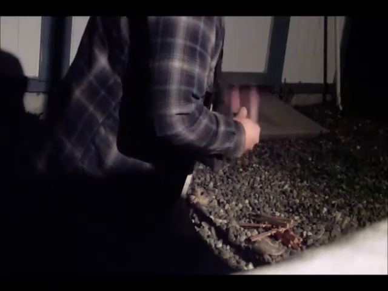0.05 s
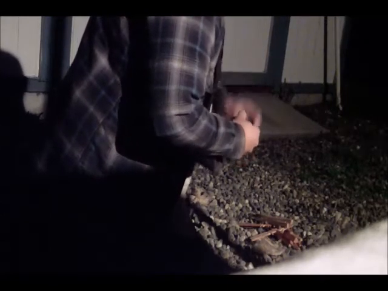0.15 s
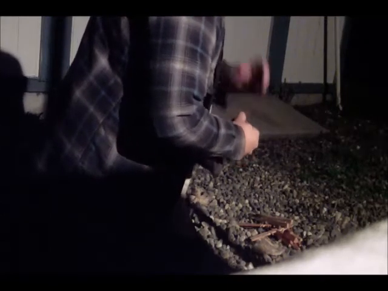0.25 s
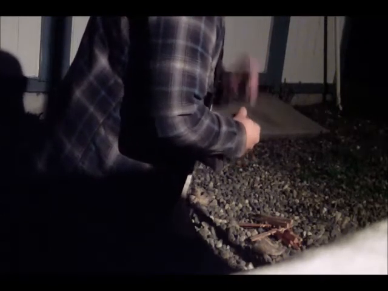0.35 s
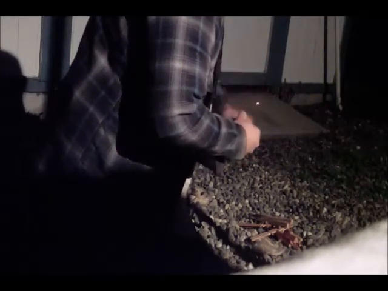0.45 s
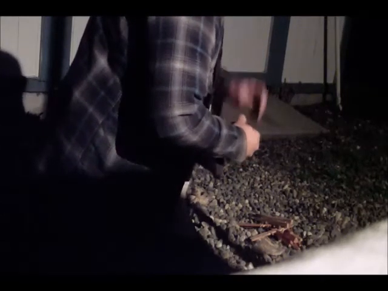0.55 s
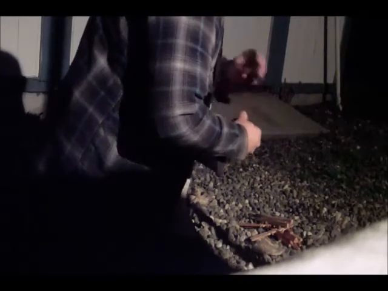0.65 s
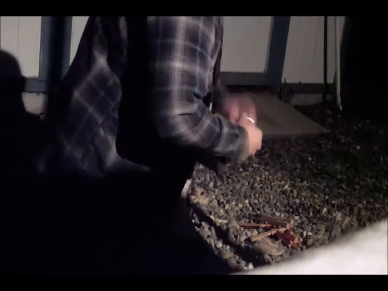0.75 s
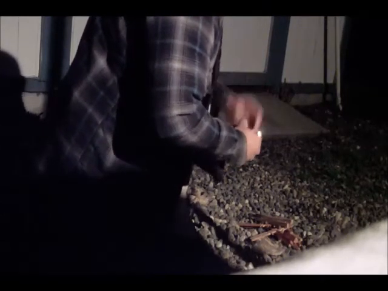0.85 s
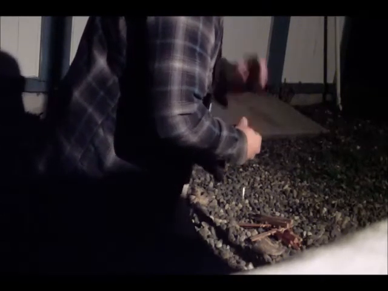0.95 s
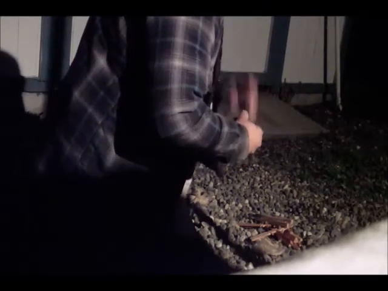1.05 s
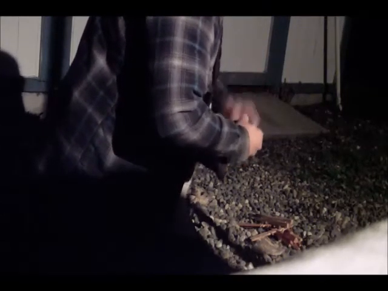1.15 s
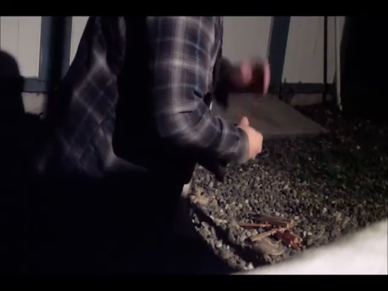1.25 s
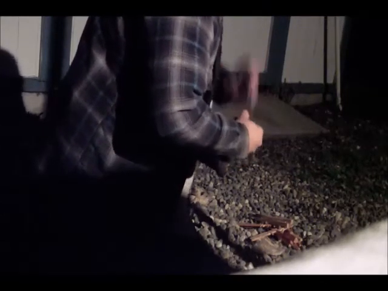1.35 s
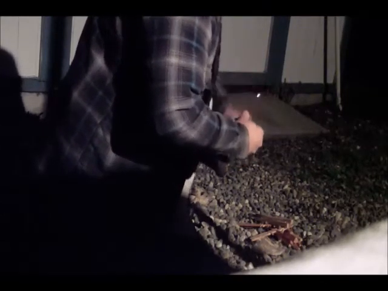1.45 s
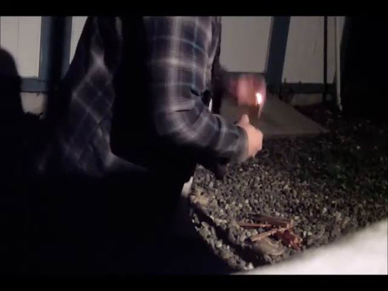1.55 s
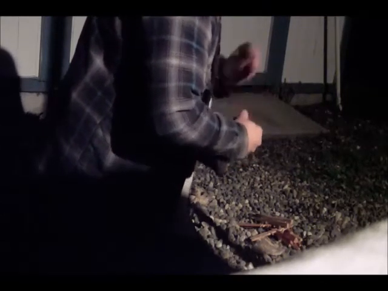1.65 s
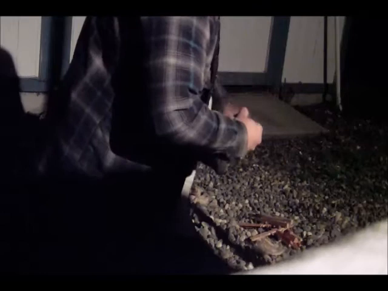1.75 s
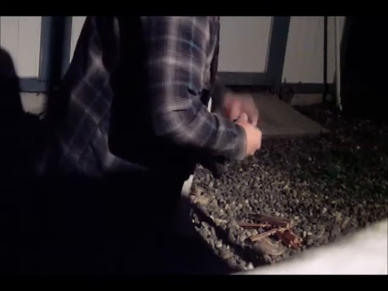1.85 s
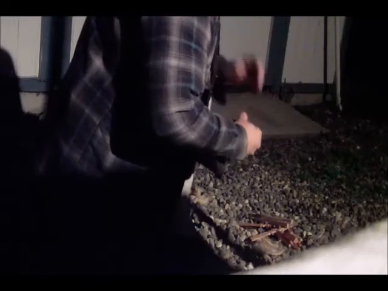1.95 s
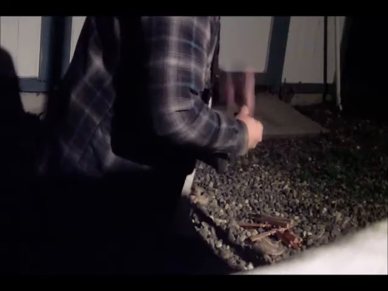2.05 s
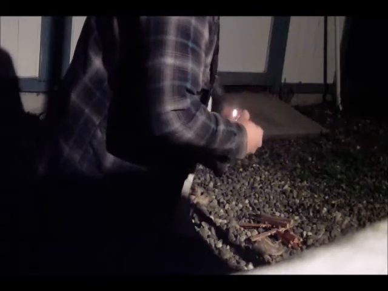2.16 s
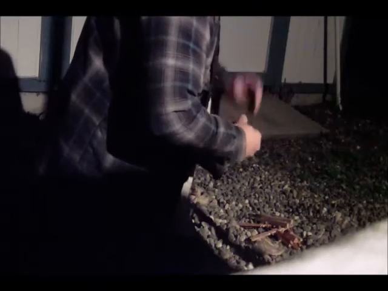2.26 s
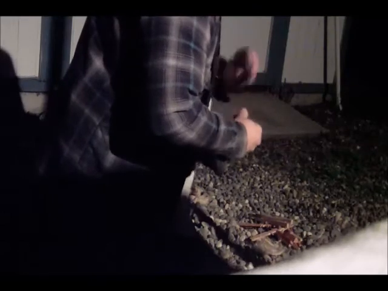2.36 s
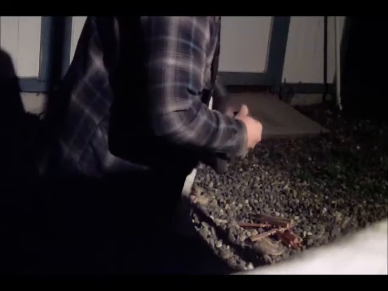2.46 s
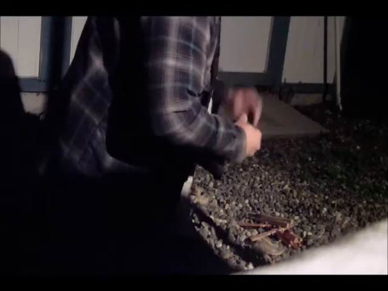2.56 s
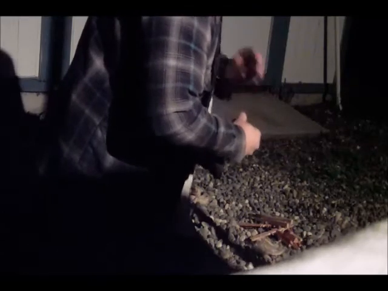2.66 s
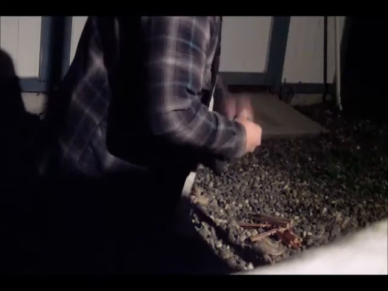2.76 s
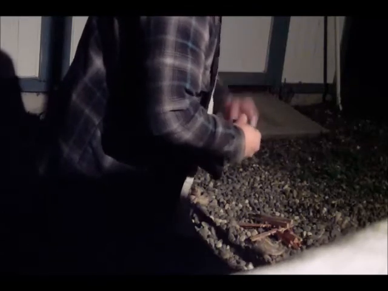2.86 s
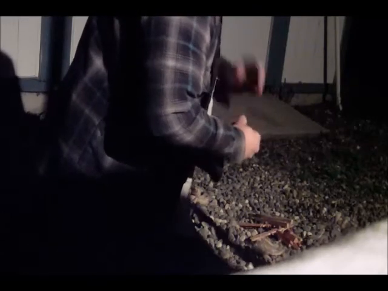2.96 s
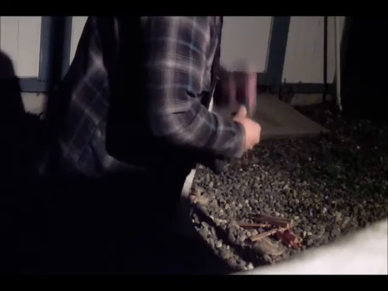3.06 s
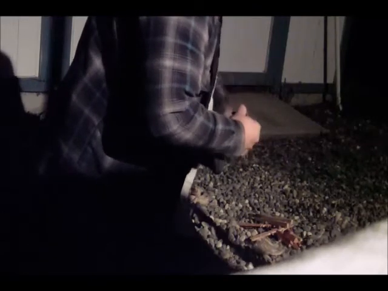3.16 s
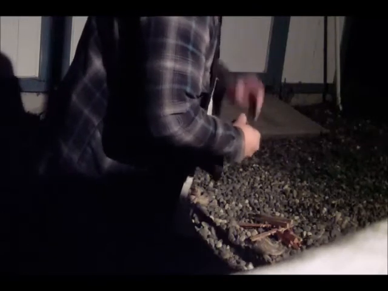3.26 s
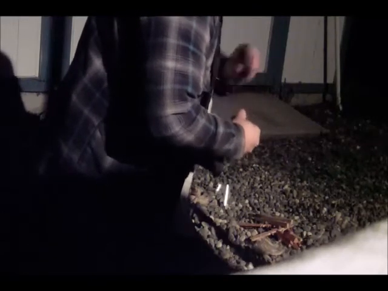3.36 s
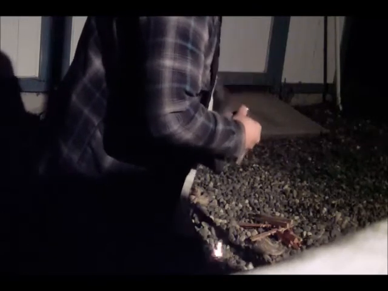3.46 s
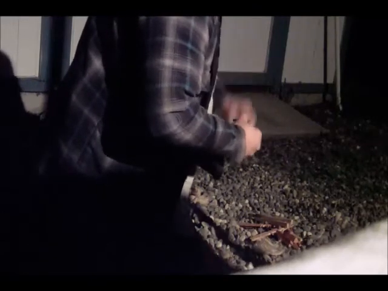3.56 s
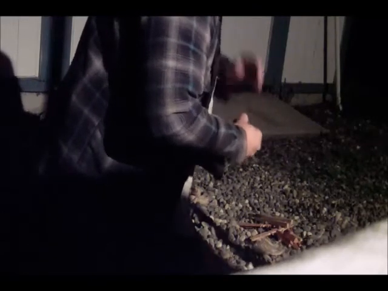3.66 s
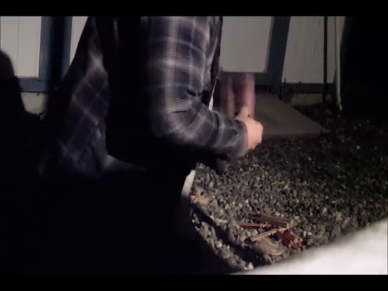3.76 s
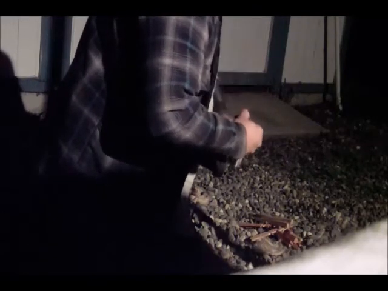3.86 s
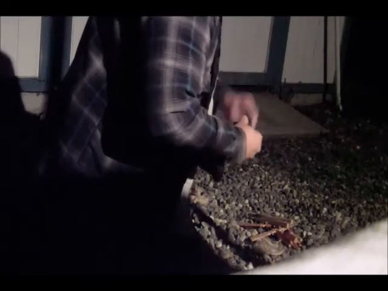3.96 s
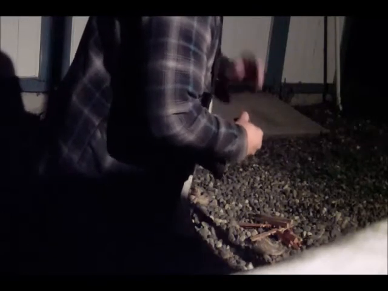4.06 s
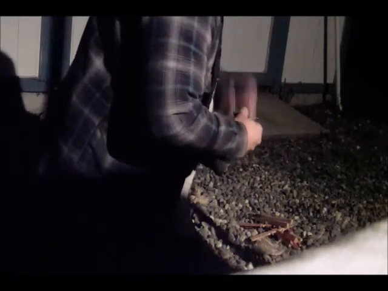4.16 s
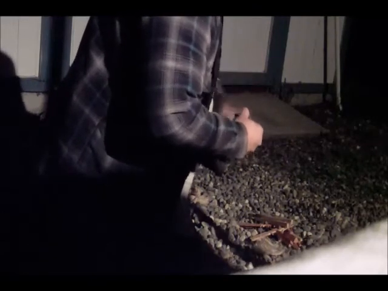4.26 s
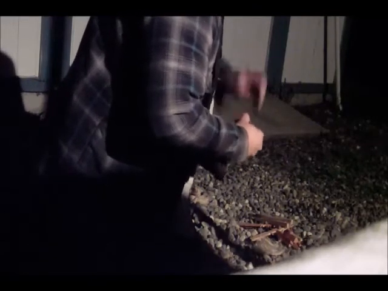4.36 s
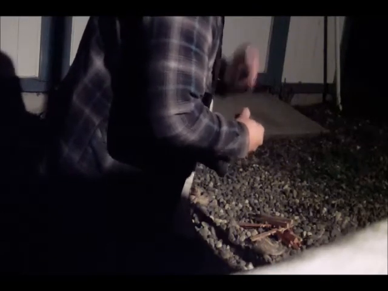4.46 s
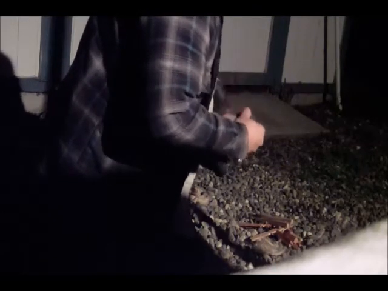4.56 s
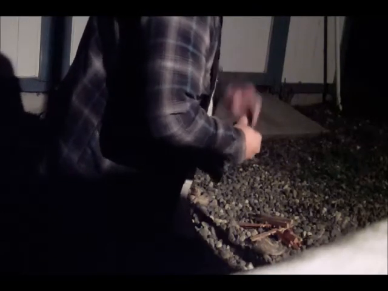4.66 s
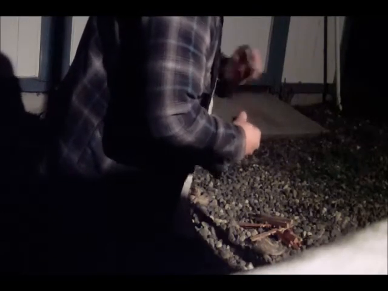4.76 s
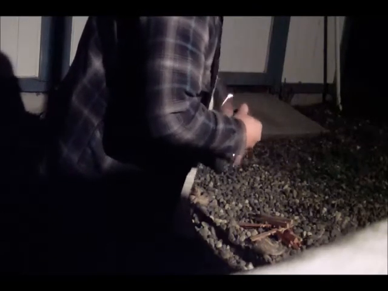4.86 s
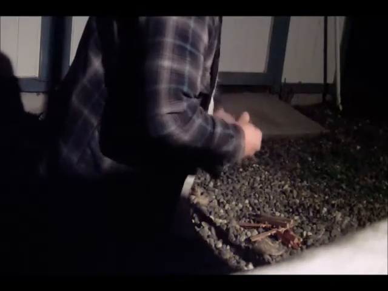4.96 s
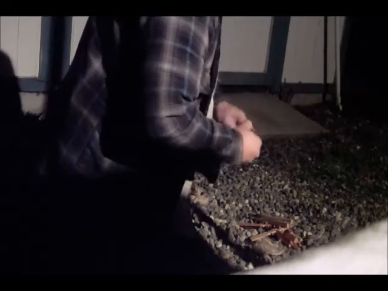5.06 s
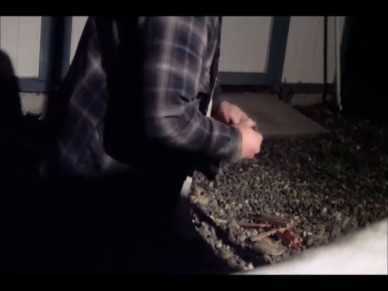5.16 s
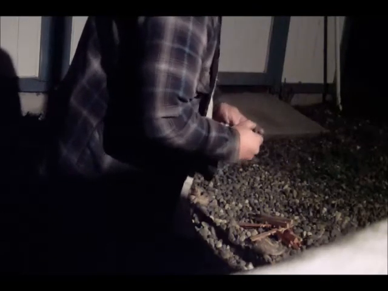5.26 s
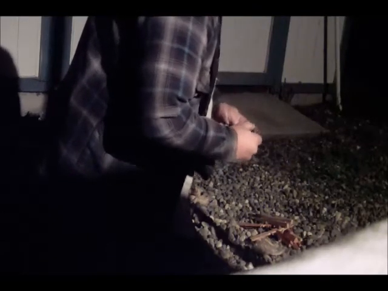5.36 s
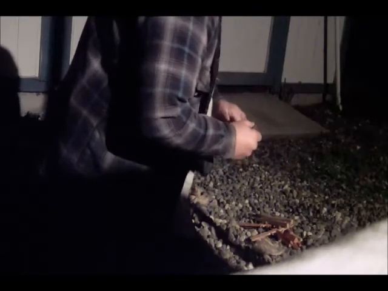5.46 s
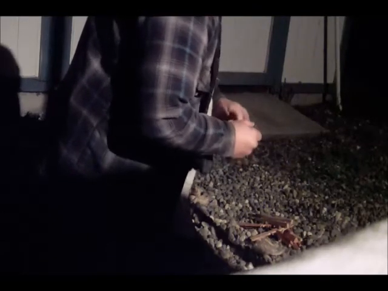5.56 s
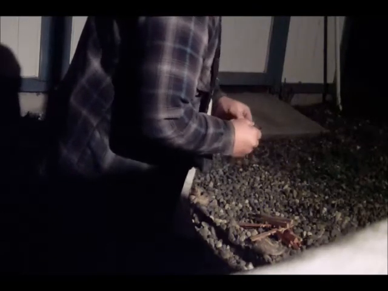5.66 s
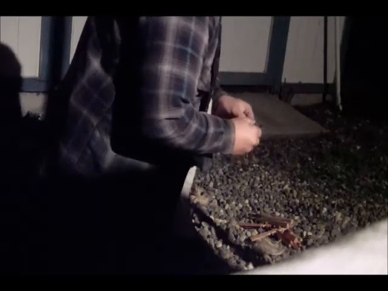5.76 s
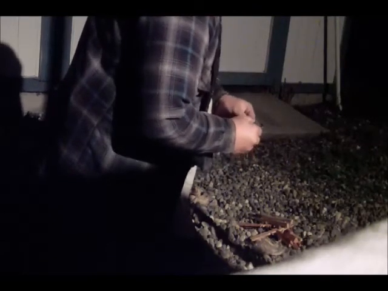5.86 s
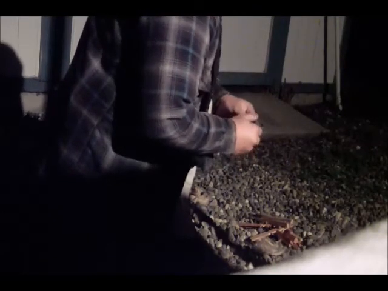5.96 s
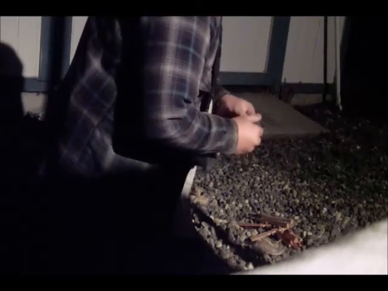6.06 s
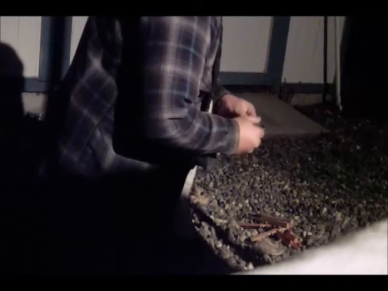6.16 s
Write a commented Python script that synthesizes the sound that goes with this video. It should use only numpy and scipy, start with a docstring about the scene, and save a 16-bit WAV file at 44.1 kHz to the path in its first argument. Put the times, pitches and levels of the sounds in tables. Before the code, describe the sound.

Fifteen quick, steady strokes of steel on flint, bright hard clicks with tiny gritty scrapes, outdoors at night over low distant traffic rumble and hiss.

```python
"""Flint and steel beside a wall, night

A steel striker is knocked against a flint held in the hand, fifteen quick strokes.
Each stroke is one to three contacts: a click and gritty noise ring resonances of stone and steel.
Decaying noise makes the answers of the near wall and the wider yard.
Far traffic, a wavering rumble and tyre rush of shaped noise, hums under microphone hiss.
The recorder's limiter ducks on the loudest blows."""
import sys
import numpy as np
from scipy import signal
from scipy.fft import rfft, irfft, next_fast_len
from scipy.io import wavfile
from scipy.ndimage import uniform_filter1d, minimum_filter1d, map_coordinates

SR = 44100
rng = np.random.default_rng(int(sys.argv[2]) if len(sys.argv) > 2 else 0)


def elevation(decibels):
    """Turn decibel levels (scalar or array-like) into linear amplitude ratios."""
    levels = np.asarray(decibels, float)
    return 10 ** (levels / 20)


def bounce(signal):
    """Save signal as a 16-bit WAV file at the path given by the first command-line argument."""
    frames = np.transpose(np.atleast_2d(signal))
    limited = np.clip(frames, -1, 1)
    pcm = np.round(limited * 32767).astype(np.int16)
    wavfile.write(sys.argv[1], SR, pcm)


N = 273287


def unit(x):
    """Scale to rms 1."""
    return x / np.sqrt(np.mean(x ** 2) + 1e-20)


def along(points, hz):
    """Read a curve of (f/Hz, value) points on a log frequency axis."""
    f, v = np.transpose(points)
    return np.interp(np.log(hz + 1), np.log(f + 1), v)


def filtered(x, response):
    """Multiply the spectrum of x by a response of frequency."""
    m = next_fast_len(x.shape[-1] + 8192)
    spectrum = rfft(x, m) * response(np.fft.rfftfreq(m, 1 / SR))
    return irfft(spectrum, m)[..., :x.shape[-1]]


def wobble(rate):
    """A smooth random curve, rate knots a second."""
    knots = rng.standard_normal(int(N * rate / SR) + 4)
    return map_coordinates(knots, [np.arange(N) * rate / SR])


def rush(gain, alike):
    """Stereo noise of rms 1; the mid/side balance sets how alike left and right are."""
    def mid_side(hz):
        turn = np.arccos(np.clip(along(alike, hz), -1, 1)) / 2
        return gain(hz) * [np.cos(turn), np.sin(turn)]

    mid, side = filtered(rng.standard_normal((2, N)), mid_side)
    return unit(np.array([mid + side, mid - side]))


def traffic():
    """Far engines rumble and waver; tyre rush lies above them."""
    # spectrum of the far road: f/Hz, relative level per Hz/dB
    road_tone = [(12, -61), (20, -6), (97, 4), (123, -3), (156, -6), (311, -19), (459, -18), (677, -18),
                 (738, -17), (917, -16.5), (2040, -31.5), (2420, -40.5), (3500, -45.5), (4550, -59.5),
                 (7700, -120)]
    # slow swell of the rumble: t/s, level/dB
    rumble_swell = [(0.0, -34), (1.09, -33.5), (1.49, -35), (4.37, -34.5), (4.77, -36.5), (5.57, -36),
                    (6.1, -34)]
    # left-right likeness of the road: f/Hz, correlation
    road_likeness = [(40, 0.94), (130, 1), (300, 0.92), (700, 0.97), (1400, 0.93), (3000, 0.74)]
    low = lambda hz: 1 / (1 + (hz / 240) ** 6)  # power share of the rumble
    rumble = rush(lambda hz: elevation(along(road_tone, hz)) * np.sqrt(low(hz)), road_likeness)
    tyres = rush(lambda hz: elevation(along(road_tone, hz)) * np.sqrt(1 - low(hz)), road_likeness)
    s, swell_db = np.transpose(rumble_swell)
    rumble_db = np.interp(np.arange(N) / SR, s, swell_db) + 0.8 * wobble(5)
    tyres_db = -40 + 0.94 * wobble(5.3)
    return elevation(rumble_db) * rumble + elevation(tyres_db) * tyres


def hiss():
    """Steady noise of the microphones, less alike left to right in the treble."""
    # spectrum of the hiss: f/Hz, relative level per Hz/dB
    hiss_tone = [(1470, -4.5), (2500, -4.5), (2720, -5.5), (3130, -6), (5650, -7.5), (6650, -9.5),
                 (16000, -14.5)]
    likeness = [(3000, 0.49), (15000, 0.0494)]  # f/Hz, left-right correlation
    noise = rush(lambda hz: elevation(along(hiss_tone, hz)) * (hz < 15800), likeness)
    return elevation(-51.5) * noise


def modes(table, force, scatter_db=2.0):
    """The force rings causal resonances at new strengths; the first 3 ms have envelope level 1."""
    gain = elevation(scatter_db * rng.standard_normal(len(table)))

    def body(hz):
        total = 0
        for k, (centre, width, db) in enumerate(table):
            damping = 1j * hz * width
            resonance = damping / (centre * centre - hz * hz + damping)
            total = total + (-1) ** k * gain[k] * elevation(db) * resonance  # neighbours in opposite sign
        return total

    ring = filtered(force, body)
    return ring / np.sqrt(2 * np.mean(ring[:3 * SR // 1000] ** 2))


def contact_force(t):
    """A one-sample click, then the edge grinds uneven grains of stone, a short bite and a longer scrape."""
    bite_db, bite_t60_s = -21.5, 0.005
    scrape_db, scrape_t60_s = -28, 0.025
    grain_scatter_db = 4.5
    grit = rng.standard_normal(len(t)) * elevation(grain_scatter_db * rng.standard_normal(len(t)))
    bite = elevation(bite_db - 60 * t / bite_t60_s)
    scrape = elevation(scrape_db - 60 * t / scrape_t60_s)
    return (t < 1 / SR) + grit * (bite + scrape)


def strikes():
    """Each contact is a sharp blow and a short gritty scrape of the edge, ringing stone and steel."""
    # steel modes in three families, damped by the fingers: f/Hz, width/Hz, relative level/dB
    steel_low = [(3116, 360, -1.5), (3710, 410, -0.5), (4490, 450, -1.5), (4740, 254, 3.5),
                 (5540, 780, 0.5), (5690, 270, 6), (6096, 170, -6.5)]
    steel_mid = [(8110, 1120, -10.5), (8830, 270, 3.5), (9150, 490, -0.5), (9550, 336, 4),
                 (10190, 1400, -16)]
    steel_top = [(12460, 770, -15), (13000, 590, -12), (13610, 280, 1), (14600, 700, -22.5)]
    # the stone, a dull knock into the palm and a bright clack: f/Hz, width/Hz, relative level/dB
    palm_knock = [(590, 670, 0), (1047, 470, -5.5), (1546, 600, 6.5)]
    bright_clack = [(1917, 470, -15.5), (2067, 182, -0.5), (2150, 210, 0.5), (2365, 186, 0),
                    (2470, 250, -3.5), (2785, 260, -11)]
    # full blows, envelope levels over the first 3 ms of each part:
    # t/s, clack level/dB, low steel level/dB, middle steel level/dB, top steel level/dB
    full_blows = [(0.1272, -13, -13, -13, -18.5), (0.4524, -10, -11, -3.5, -3.5),
                  (0.8095, -9.5, -13, -19, -26.5), (1.1437, -16.5, -16.5, -16, -24),
                  (1.4588, -15, -18.5, -11, -23), (1.7921, -8, -7, -10, -33),
                  (2.1401, -15, -11, -17, -16.5), (2.4894, -11.5, -9.5, -13.5, -33),
                  (2.8072, -8.5, -11.5, -15.5, -13.5), (3.1484, -7.5, -10.5, -16, -36.5),
                  (3.4901, -9, -13.5, -18.5, -23.5), (3.8354, -7, -9.5, -12, -41),
                  (4.238, -7.5, -9.5, -10.5, -16), (4.5717, -4.5, -9.5, -11.5, -27.5),
                  (4.8966, -14, -10.5, -14, -16)]
    # the edge grazes the stone just before a blow or skips on it just after:
    # t/s, clack level/dB, low steel level/dB
    edge_grazes = [(0.1338, -18.5, -24), (0.4499, -46, -29), (0.8166, -16, -30), (1.1505, -18.5, -26),
                   (1.468, -24, -19), (1.7945, -22, -21), (1.8008, -26, -26.5), (2.1454, -7, -18),
                   (2.496, -25, -22), (2.818, -13.5, -18.5), (3.1544, -29.5, -15), (3.487, -25, -16.5),
                   (3.848, -15, -16), (4.2369, -19.5, -23), (4.5674, -12, -11.5), (4.899, -13, -19)]
    t = np.arange(SR // 10) / SR
    out = np.zeros(N + SR)
    # a graze rings the higher steel modes less than the low ones
    grazes = [(s, stone_db, db, db - 7, db - 5.5 ) for s, stone_db, db in edge_grazes]
    for s, stone_db, low_db, mid_db, top_db in full_blows + grazes:
        force = contact_force(t)
        stone = elevation(-12.5) * modes(palm_knock, force) + modes(bright_clack, force)
        blow = elevation(stone_db) * stone
        blow += elevation(low_db) * modes(steel_low, force)
        blow += elevation(mid_db) * modes(steel_mid, force)
        blow += elevation(top_db) * modes(steel_top, force)
        # the bare crack of the contact, without ringing, follows the low and middle steel
        blow += elevation(-0.5) * np.hypot(elevation(low_db), elevation(mid_db)) * force
        out[round(s * SR):][:len(t)] += blow
    return out[:N]


def walls(x):
    """Near surfaces return copies smeared by gravel and cloth, redrawn each third of a second as hands shift."""
    # ground, body and wall echoes: t/s, level/dB
    near_echoes = [(.0035, -25), (.0075, -27), (0.013, -31), (.0185, -29), (0.028, -33)]
    t = np.arange(SR // 16) / SR
    out = np.zeros(N + SR)
    step = SR // 3
    for i in range(0, N, step):
        answer = rng.standard_normal(len(t)) * elevation(-29.5 - 60 * t / 0.062)  # diffuse part, t60 62 ms
        for s, db in near_echoes:
            smear = elevation(db - 60 * np.abs(t - s) / 0.0048)  # t60 4.8 ms
            answer += smear * rng.standard_normal(len(t)) * (t >= s)
        wet = signal.fftconvolve(x[i:i + step], answer)
        out[i:][:len(wet)] += wet
    return out[:N]


def yard(x):
    """A wide diffuse tail from farther walls, redrawn each third of a second; treble dies first."""
    # decay of the yard: f/Hz, t60/s
    yard_decay = [(800, .3), (2200, 0.64), (3600, 0.45), (6000, 0.39), (9500, 0.28), (14000, 0.18)]
    # colour of the tail at its start: f/Hz, relative level/dB
    tail_colour = [(1000, 3), (2300, -6.5), (3600, 9), (6000, -3), (10000, 3), (14000, 0), (15500, -18)]
    out = np.zeros((2, N + 2 * SR))
    step = SR // 3
    far = round(0.014 * SR)  # the tail sets in 14 ms late
    for i in range(0, N, step):
        hz, t, z = signal.stft(rng.standard_normal((2, SR // 2)), SR, nperseg=256)
        tail_db = along(tail_colour, hz)[:, None] - 60 * t / along(yard_decay, hz)[:, None]
        mid, side = signal.istft(z * elevation(tail_db), SR, nperseg=256)[1]
        side = filtered(side, lambda f: np.clip(f / 10000, 0.2, 0.7))  # wider in the treble
        tail = mid + np.array([1, -1])[:, None] * side
        tail = tail / np.linalg.norm(tail[0])
        wet = signal.fftconvolve(x[None, i:i + step], tail, axes=1)
        out[:, i + far:][:, :wet.shape[1]] += wet
    return out[:, :N]


def scene():
    """Strokes in their echoes over the night hum."""
    hits = strikes()
    return hits + walls(hits) + elevation(-14) * yard(hits) + traffic()


def ports(hz, vent_hz, lag, roll_hz):
    """The left port leaks bass through its vent, is a little quieter and later; both lose extreme treble."""
    # balance of the microphone ports: f/Hz, left-minus-right level/dB
    port_lean = [(300, -2), (2400, -1.83), (8000, -2.1)]
    left = 1j * hz / (vent_hz + 1j * hz) * np.exp(-2j * np.pi * hz * lag)
    treble = 1 / (1 - (hz / roll_hz) ** 2 + 1.2j * hz / roll_hz) ** 2
    balance = elevation(np.outer([0.5, -0.5], along(port_lean, hz)))
    return treble * balance * [left, np.ones_like(hz)]


def limiter(x, ceiling_db, attack, hold, release_db):
    """Gain falls within a few ms of an overload, holds, then climbs back at release_db a second."""
    over = np.maximum(0, 20 * np.log10(np.abs(x).max(0) + 1e-9) - ceiling_db)
    size = round(hold * SR)
    held = -minimum_filter1d(-over, size, origin=(size - 1) // 2)
    climb = release_db * np.arange(N) / SR
    cut_db = np.maximum.accumulate(held + climb) - climb
    size = round(attack * SR)
    return x * elevation(-uniform_filter1d(cut_db, size, origin=(size - 1) // 2))


def roll_off(x):
    """The treble ends steeply here."""
    return signal.sosfilt(signal.butter(12, 16500, fs=SR, output="sos"), x)


def record(dry):
    """Unequal microphone ports, their own hiss, limiter and a hard ceiling."""
    x = filtered(dry, lambda hz: ports(hz, vent_hz=75, lag=6e-6, roll_hz=15600))  # lag in s
    x = x + hiss()
    x = limiter(x, ceiling_db=-0.5, attack=0.0037, hold=0.011, release_db=160.5)  # times in s
    mix = np.clip(x, -1, 1)
    return roll_off(mix)


dry = scene()
out = record(dry)
bounce(out)
```